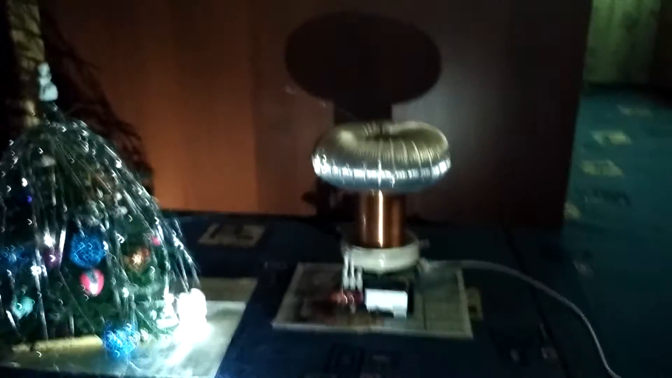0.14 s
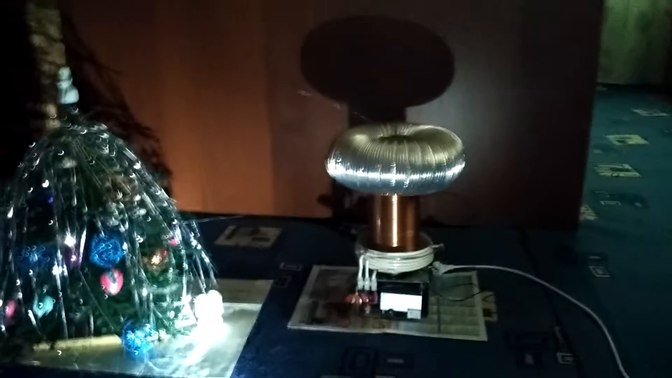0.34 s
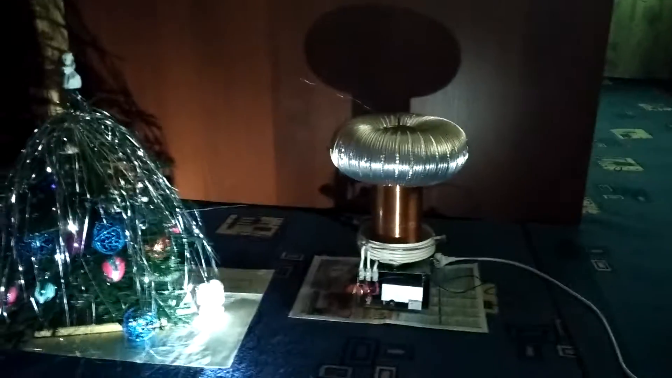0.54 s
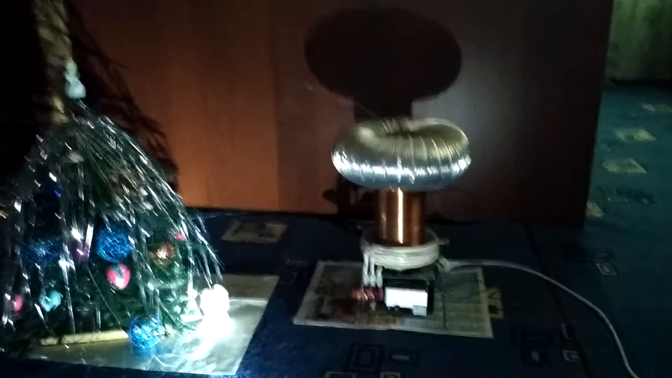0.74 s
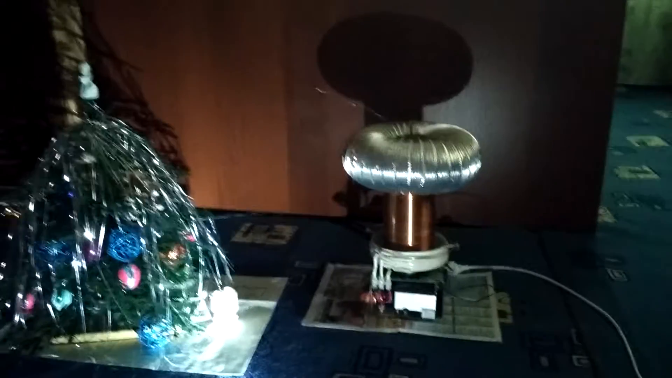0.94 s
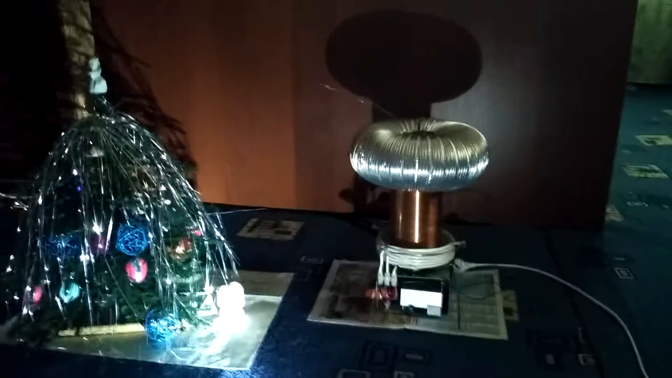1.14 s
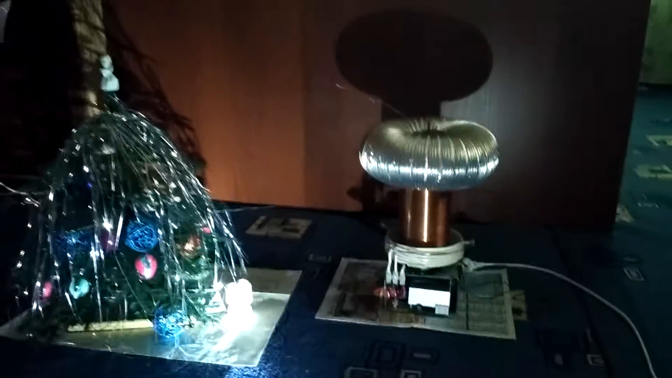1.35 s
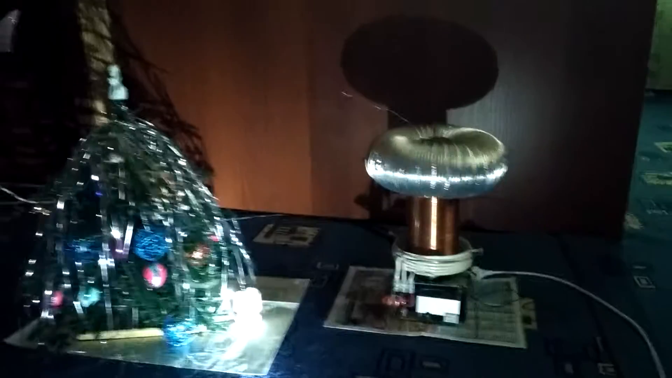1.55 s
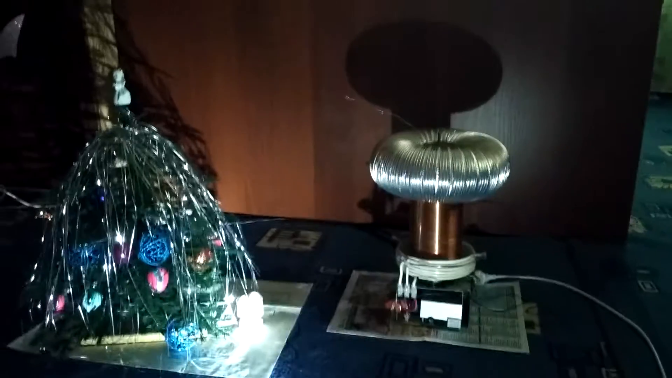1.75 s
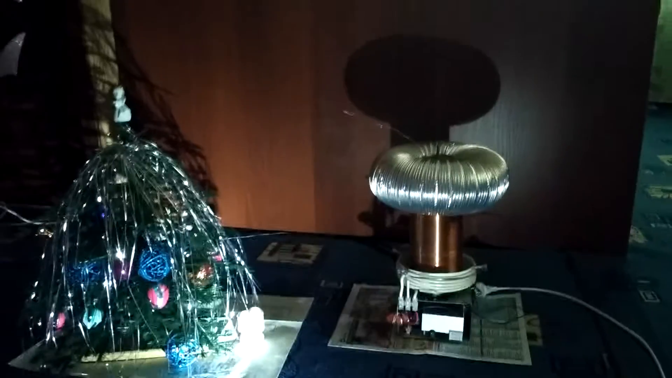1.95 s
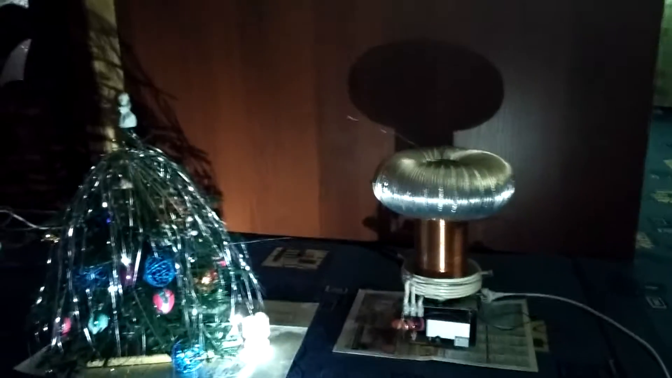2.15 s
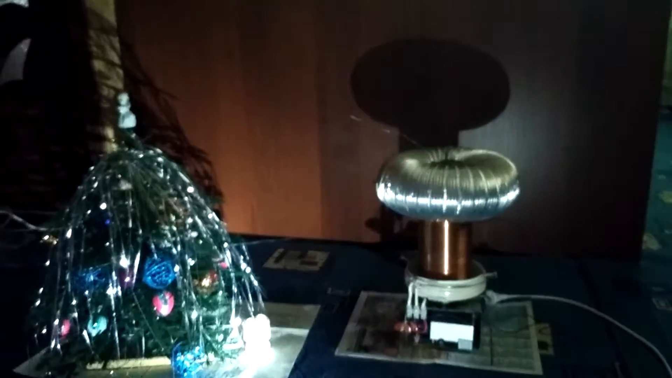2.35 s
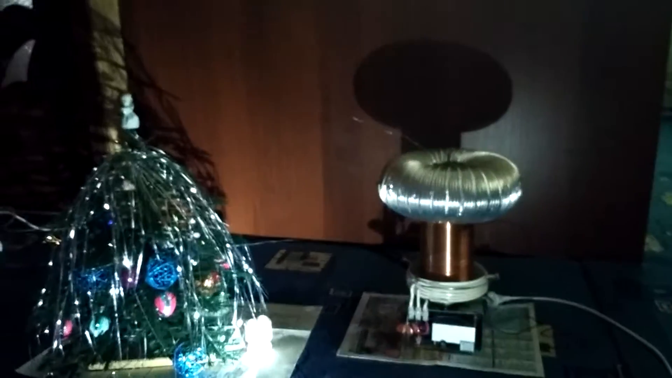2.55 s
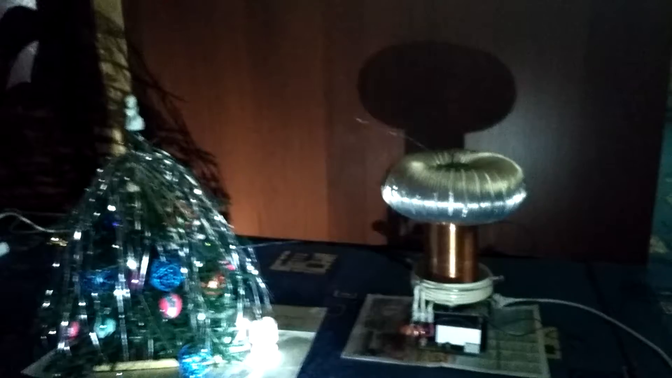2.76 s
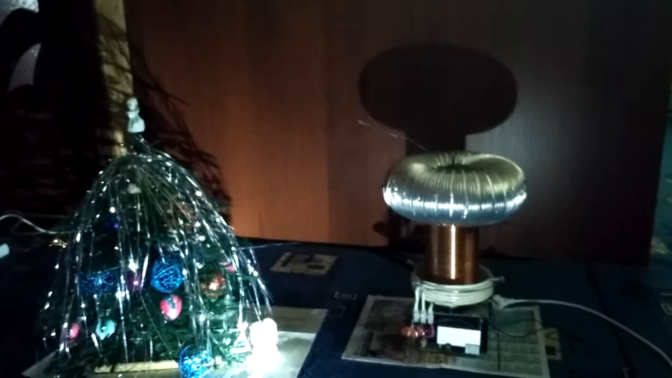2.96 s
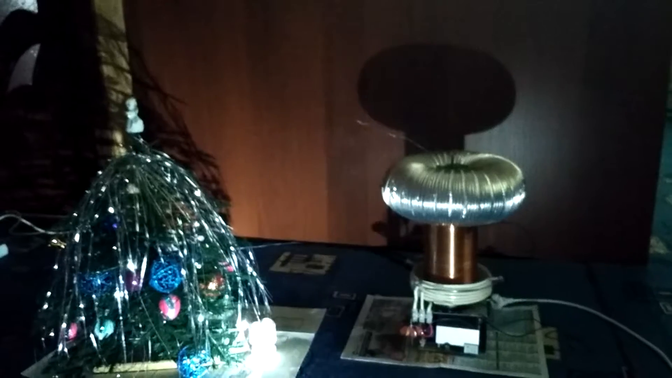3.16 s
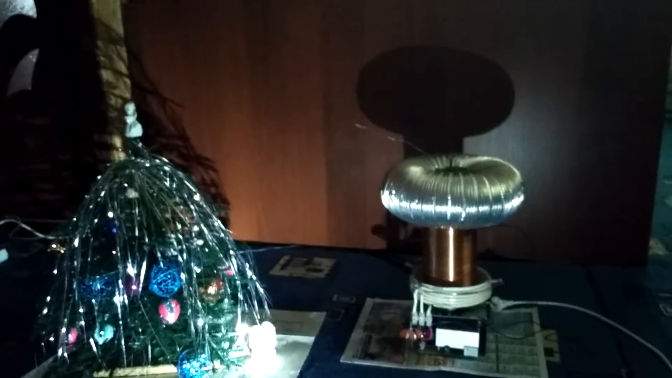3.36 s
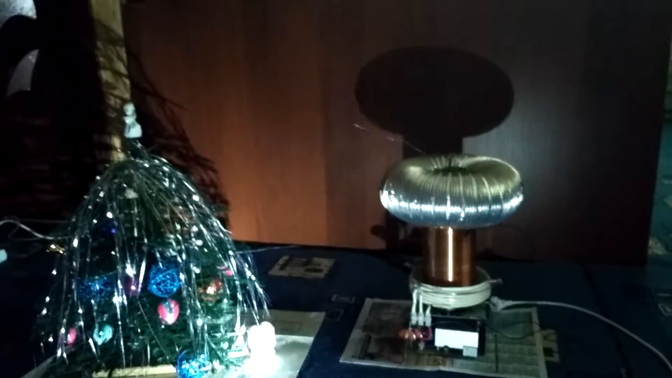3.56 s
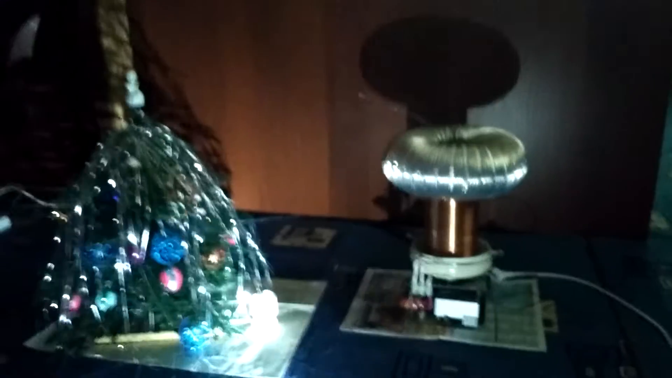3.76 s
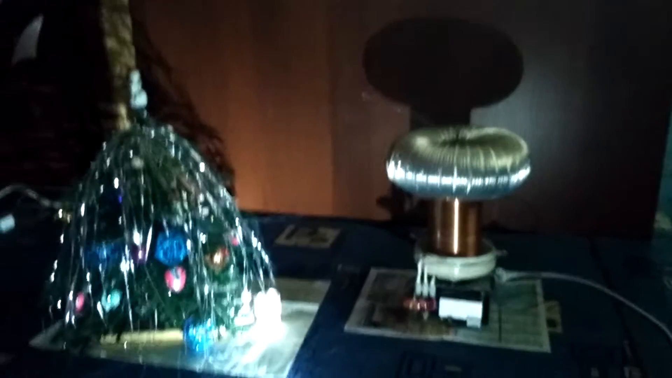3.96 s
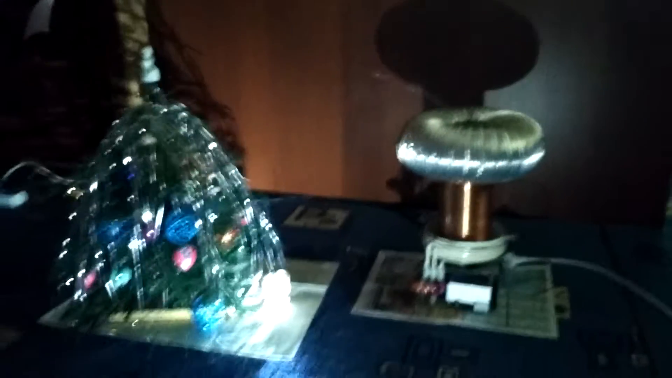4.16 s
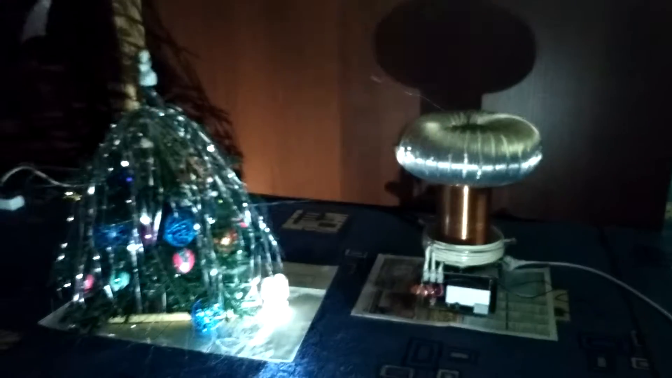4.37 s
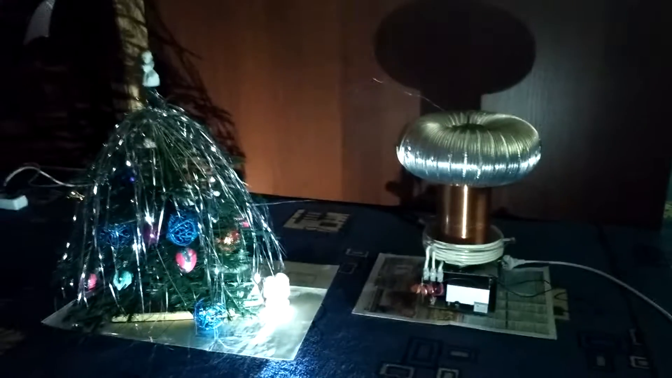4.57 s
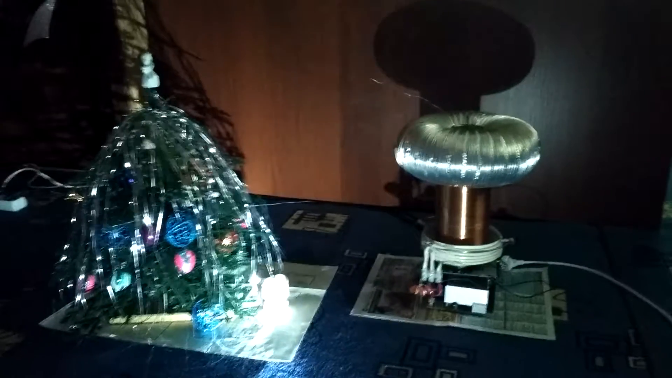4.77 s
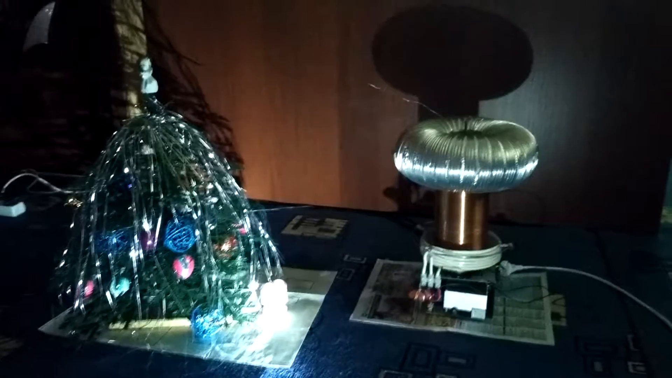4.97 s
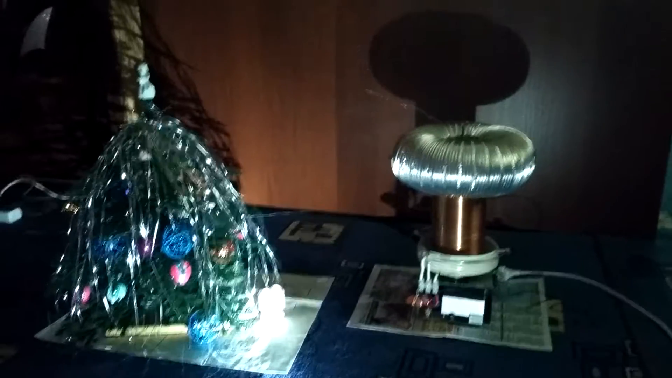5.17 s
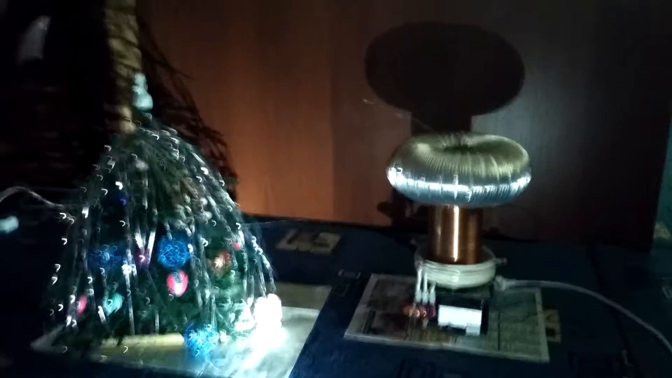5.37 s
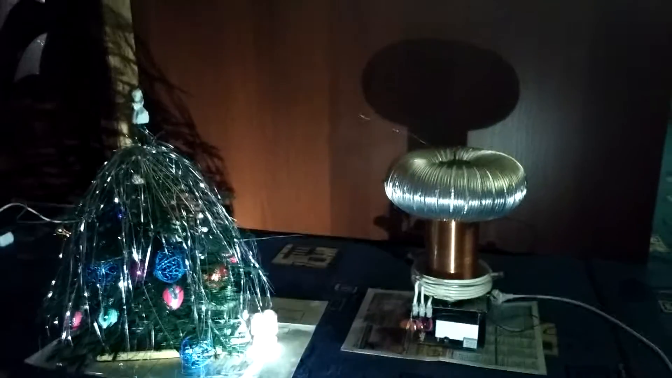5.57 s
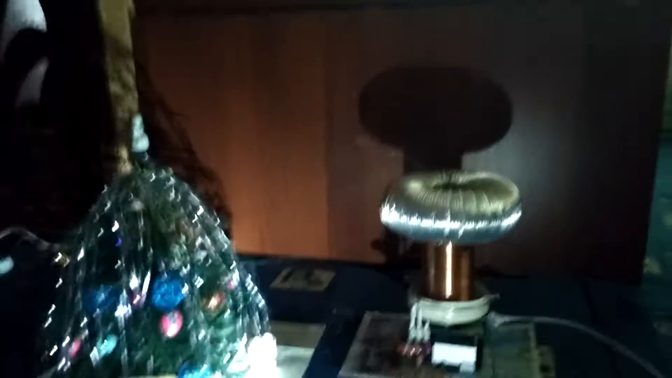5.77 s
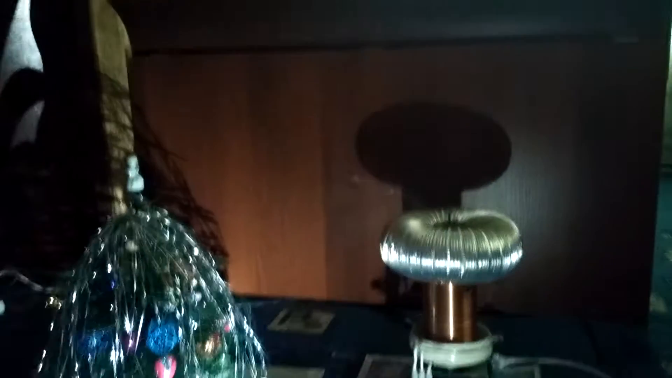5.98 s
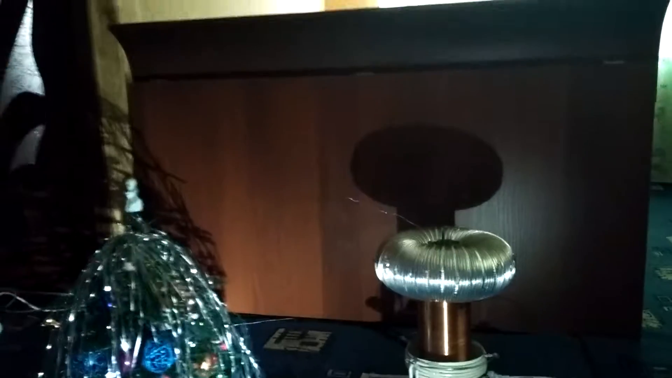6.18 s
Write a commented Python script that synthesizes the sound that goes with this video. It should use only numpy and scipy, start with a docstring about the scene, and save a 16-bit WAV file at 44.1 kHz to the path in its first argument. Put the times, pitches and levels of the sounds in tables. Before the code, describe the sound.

Close, overloaded microphone in a small indoor room. Handling thuds come first, the heaviest almost at once, followed by a light click over soft room hush. From about 1.4 seconds electric arcs snap in a strict rapid rhythm, five each second, until the end. Every snap is an abrupt bang with fizzing, grainy noise and dense early echoes, dying before the next; later ones sound brighter and more crackly.

```python
"""A furnished room: a small high-voltage coil fires five sparks a second close to a camera.
Each arc sends a shock pulse and a grainy noise crackle, which brighten as the arcs grow.
Wall echoes, a diffuse noise tail and ringing modes answer much alike; the microphone overloads.
Handling thumps come mostly before the sparks, with one among them; before them also faint timer
ticks and a switch click. Quiet room noise lies under all."""
import sys
import numpy as np
from scipy import signal
from scipy.io import wavfile
from scipy.ndimage import uniform_filter1d

SR = 44100
rng = np.random.default_rng(int(sys.argv[2]) if len(sys.argv) > 2 else 0)


def transcribe(signal):
    """Save signal, clipped to [-1, 1], as a 16-bit WAV file at the path in sys.argv[1]."""
    frames = np.atleast_2d(signal).T
    limited = np.clip(frames, -1, 1)
    pcm = np.round(limited * 32767).astype(np.int16)
    wavfile.write(sys.argv[1], SR, pcm)


def natural_amplitude(level_db):
    """Convert a level in decibels to a linear amplitude factor, elementwise."""
    exponent = np.asarray(level_db, float) / 20
    return 10 ** exponent


N = 274302


def read_table(points, hz):
    """Interpolates a spectrum table on a log-frequency axis."""
    table_hz, value = np.transpose(points)
    return np.interp(np.log(hz + 1), np.log(table_hz + 1), value)


def add(mix, start_s, sound):
    """Mixes a sound in at start_s; the end of the mix cuts it off."""
    part = mix[round(start_s * SR):][:len(sound)]
    part += sound[:len(part)]


def hush():
    """Quiet room: shaped noise with rumble and faint resonances in drifting patches."""
    # Each row: frequency in Hz, relative density in dB per Hz.
    hush_spectrum = [(25, -14.5), (78, 2.5), (140, -9.5), (280, -13), (400, -12), (480, -21.5),
                     (580, -14.5), (720, -28.5), (930, -17), (1300, -23), (2000, -26), (4800, -35.5),
                     (8000, -49), (16000, -48.5)]
    level_db, patch_rms_db = -54.5, 1.5
    frames, hz = N // 512 + 5, np.fft.rfftfreq(2048, 1 / SR)
    real, imag, patches = rng.standard_normal((frames, 1025, 3)).T
    patches = uniform_filter1d(patches, 10, axis=0)  # across frequency
    patches = uniform_filter1d(patches, 8, axis=1)  # across time
    shape_db = read_table(hush_spectrum, hz)[:, None] + patch_rms_db * patches / patches.std()
    noise = signal.istft((real + 1j * imag) * natural_amplitude(shape_db), nperseg=2048, noverlap=1536)[1][:N]
    return natural_amplitude(level_db) * noise / noise.std()


def bump(t, level_db, hz):
    """Dull bump: a sine that swells for about a cycle and sags in pitch."""
    rise_cycles, pitch_sag_per_s = 0.68, 2.6
    u = t * hz / rise_cycles
    swell = u * np.exp(1 - u)
    return -natural_amplitude(level_db) * swell * np.sin(2 * np.pi * hz * t * (1 - pitch_sag_per_s / 2 * t))


def click(t, level_db, hz, hiss_db, t60_s):
    """Small click: a short sine snap with decaying high-passed hiss behind it."""
    u = t - .0003
    snap = np.exp(-(u / .00007) ** 2) * np.sin(2 * np.pi * hz * u + .6)
    highpass = signal.butter(6, 4900, "high", fs=SR, output="sos")
    hiss = signal.sosfilt(highpass, rng.standard_normal(len(t)))
    return natural_amplitude(level_db) * (snap + natural_amplitude(hiss_db - 60 * t / t60_s) * hiss)


def handling():
    """Low bumps on the camera body, ticks of the timer and bright clicks."""
    # Each row: start in seconds, level in dB, initial pitch in Hz.
    bumps = [(.018, -34.5, 74.4), (0.145, -23.5, 108), (0.147, -43, 257), (.165, -15, 66), (.167, -37, 200),
             (.198, -23.5, 50), (.265, -44.5, 65.4), (.575, -47, 78.5), (5.4, -26, 58)]
    # Each row: start in seconds, level in dB, pitch in Hz, hiss before high-pass in dB re snap, hiss t60 in s.
    clicks = [(.806, -43, 7000, -20, .02), (.812, -49, 8000, -12, .03), (.8156, -27, 7600, -27, 0.35),
              (.8368, -42, 9100, -25, .03), (1.2113, -43.5, 7050, -7.5, 0.19)]
    # Ticks in step with the timer, before any arc forms. Each row: start in seconds, level in dB.
    ticks = [(.3777, -70), (.5776, -66), (.7775, -56), (.9774, -57)]
    t, out = np.arange(SR // 4) / SR, np.zeros(N)
    for start_s, level_db, hz in bumps:
        add(out, start_s, bump(t, level_db, hz))
    for start_s, level_db in ticks:
        add(out, start_s, click(t, level_db, hz=6000, hiss_db=-12, t60_s=.04))
    for start_s, level_db, hz, hiss_db, t60_s in clicks:
        add(out, start_s, click(t, level_db, hz, hiss_db, t60_s))
    return out


def tail(noise, colour, tilt_db_per_octave=0):
    """Coloured noise whose bands die at the room's speeds; unit noise starts near rms 1."""
    # Each row: frequency in Hz, t60 in seconds.
    band_t60 = [(100, 0.45), (500, 0.4), (2000, 0.27), (4500, 0.23), (5500, 0.27), (9000, 0.22),
                (15000, 0.18)]
    shelf_lo_hz, shelf_hi_hz = 5400, 10000  # the tilt acts between these
    hz, t, z = signal.stft(noise, SR, nperseg=256, noverlap=192)
    octaves = np.log2(np.clip(hz, shelf_lo_hz, shelf_hi_hz) / shelf_lo_hz)
    shape = natural_amplitude(read_table(colour, hz) + tilt_db_per_octave * octaves)
    shape /= np.sqrt(np.mean(shape ** 2))
    decay = natural_amplitude(-60 * t / read_table(band_t60, hz)[:, None])
    return signal.istft(z * shape[:, None] * decay, SR, nperseg=256, noverlap=192)[1][:len(noise)]


def room_answer(t):
    """Diffuse low and mid tail that follows a shock from one place."""
    # Each row: frequency in Hz, relative level in dB.
    diffuse_spectrum = [(100, -19.5), (300, -6), (500, -6), (1100, -8.5), (1500, -10.5), (2000, -11),
                        (3200, -31)]
    build_up = 1 - np.exp(-t / 0.0064)
    return natural_amplitude(-14.5) * tail(rng.standard_normal(len(t)), diffuse_spectrum) * build_up


def standing_waves(t):
    """Modes swell in and die; where the arc lands sets how hard each is struck."""
    # Room modes. Each row: frequency in Hz, relative level in dB, t60 in seconds before the extra decay.
    room_modes = [(84, -19.5, 0.3), (98.4, -17, .22), (128.5, -16.5, 0.26), (157.8, -14, 0.18),
                  (188.3, -22.5, 0.05), (228.7, -11.5, 0.15), (285.8, -21, 0.42), (359.6, -19.5, 0.42),
                  (405.7, -22.5, 0.44), (491.8, -27.5, 0.21), (559, -22, 0.081), (602, -20, 0.41),
                  (647.6, -29, 0.51), (713, -16.5, 0.15), (719.6, -18, 0.22), (819, -22.5, 0.27),
                  (829.4, -21, 0.18), (955, -26.5, 0.051), (1031, -17, .2), (1063, -14, 0.17),
                  (1096.6, -13, 0.2), (1185, -26, 0.33), (1235, -25, 0.21), (1422, -27, 0.6)]
    # Rings that build up late and outlast the rest. Each row: frequency in Hz, level in dB, t60 in seconds.
    late_rings = [(417.6, -26, .6), (533, -29, 0.68)]
    modes_db, strike_spread_db = -1.5, 2.2
    rings, late = np.zeros(len(t)), np.zeros(len(t))
    for (hz, level_db, t60_s), chance in zip(room_modes, rng.standard_normal(len(room_modes))):
        struck_db = level_db + strike_spread_db * chance
        rings += natural_amplitude(struck_db - 60 * t / t60_s) * np.sin(2 * np.pi * hz * t)
    for hz, level_db, t60_s in late_rings:
        late += natural_amplitude(level_db - 60 * t / t60_s) * np.sin(2 * np.pi * hz * t)
    extra_decay_db = -40 * (t / 0.2) ** 2  # the rings die ever faster, so the diffuse tail outlasts them
    rings *= natural_amplitude(modes_db + extra_decay_db) * (1 - np.exp(-t / 0.0025))
    return rings + late * (1 - np.exp(-(t / .04) ** 2))


def shocks(t):
    """A push and a pull for every path; the arc's new shape shifts and scales each a little."""
    # Direct shock and its strongest reflections. Each row: delay in seconds, relative level in dB.
    echo_paths = [(.0004, -3.5), (.0017, -9), (.0033, 1.5), (.0042, -7), (.0062, -6.5), (.0088, -13),
                  (0.0113, -1), (0.0122, -0.5), (0.015, -3), (0.02, -17.5), (.0260, -14), (.0290, -22),
                  (0.0367, -10.5), (0.0393, -8)]
    shift_spread_s, spread_db, push_s = .00004, 1.0, 0.00021
    out = np.zeros(len(t))
    for (delay_s, level_db), (shift, scale) in zip(echo_paths, rng.standard_normal((len(echo_paths), 2))):
        u = (t - delay_s - shift_spread_s * shift) / push_s
        pulse = np.exp(-u ** 2) - 0.38 * np.exp(-((u - 2.3) / 3.2) ** 2)
        out += natural_amplitude(level_db + spread_db * scale) * pulse
    return out


def crackle(t, tilt_db_per_octave):
    """The branching arc crackles: noise in uneven grains, new every spark."""
    # Each row: frequency in Hz, relative level in dB.
    crackle_spectrum = [(600, -20.5), (1500, 1.5), (2500, -1.5), (5000, -1.5), (9000, -4.5), (15500, -4)]
    noise, grain = rng.standard_normal((2, len(t)))
    # reflections smooth the grains out
    grain_db = 16 * uniform_filter1d(grain, size=21) * np.exp(-t / 0.086)
    return tail(noise * natural_amplitude(grain_db), crackle_spectrum, tilt_db_per_octave) * (1 - np.exp(-t / 0.0012))


def sparks():
    """The timer fires the coil five times a second; the arcs grow, gain shock level and brighten."""
    # How hard each arc crackles: one relative level in dB a firing.
    arc_crackle_db = [-2, -1, -1.75, 0.2, -1.6, -1.3, -1.2, -1, 0.5, 2.1, 1.1, 3.5, 0.5, 2.5, 1.1, 3.5, 1.3,
                      3.5, 2.5, 0.7, 2, 1, 2, 1, 2.5]
    first_s, period_s, jitter_s = 1.3773, .19992, .0001
    grow_mid_s, grow_width_s = 2.88, 0.27
    shock_first_db, shock_full_db, shock_spread_db = -2.05, -1.54, 0.93
    tilt_first, tilt_full, tilt_spread = -5, 1.5, 1  # dB per octave
    crackle_db, fresh_share = -9.5, .45
    t, out = np.arange(SR // 4) / SR, np.zeros(N)
    fade = natural_amplitude(-23 * (t / 0.18) ** 1.92)  # falls ever faster: 23 dB down at 0.18 s
    alike = room_answer(t)
    chances = rng.standard_normal((len(arc_crackle_db), 3))
    for k, (arc_db, (late, push, colour)) in enumerate(zip(arc_crackle_db, chances)):
        start_s = first_s + k * period_s + jitter_s * late
        grown = 1 / (1 + np.exp((grow_mid_s - start_s) / grow_width_s))
        shock_db = shock_first_db + (shock_full_db - shock_first_db) * grown + shock_spread_db * push
        tilt = tilt_first + (tilt_full - tilt_first) * grown + tilt_spread * colour
        # each arc takes a new path, so part of the answer is fresh
        body = np.sqrt(1 - fresh_share ** 2) * alike + fresh_share * room_answer(t)
        body += shocks(t) + standing_waves(t)
        spark = natural_amplitude(shock_db) * body + natural_amplitude(crackle_db + arc_db) * crackle(t, tilt)
        add(out, start_s, fade * spark)
    return out


def scene():
    """All sources at the one microphone."""
    return (hush() + handling() + sparks())[None]


def suppress(x):
    """Noise suppressor: what falls under the slow mean level is lowered; the treble follows only in part."""
    deepest_cut_db, margin_db, knee_db, memory_s = 16 / 1.5, -3, 2.2, 0.3
    split_hz, local_share, treble_share = 5000, .35, .15
    hz, t, z = signal.stft(x, SR, nperseg=512, noverlap=384)
    power = uniform_filter1d(abs(z) ** 2, size=7, axis=0)
    power = uniform_filter1d(power, size=3, axis=1)
    level_db = 10 * np.log10(abs(power) + 1e-13)
    hold = np.exp(-t[1] / memory_s)
    rise_db = level_db - level_db[:, :30].mean(axis=1, keepdims=True)
    over_db = rise_db - signal.lfilter([1 - hold], [1, -hold], rise_db, axis=1)
    treble = hz > split_hz
    over_db = local_share * over_db + (1 - local_share) * over_db[~treble].mean(axis=0)
    excess = np.clip((over_db - margin_db) / knee_db, -30, 30)
    cut_db = deepest_cut_db / (1 + np.exp(excess) / 1.5)
    cut_db[treble] = treble_share * cut_db[~treble].mean(axis=0)
    return signal.istft(z * natural_amplitude(-cut_db), SR, nperseg=512, noverlap=384)[1][:N]


def top_cut(x):
    """Nothing passes above the cut-off."""
    return signal.sosfilt(signal.butter(12, 16820, fs=SR, output="sos"), x)


def record(dry):
    """The microphone cuts deep bass and overloads; then noise suppression and the band limit."""
    ceiling, overload_power = .92, 4
    bass_cut = signal.butter(2, 72, "high", fs=SR, output="sos")
    heard = natural_amplitude(2.5) * signal.sosfilt(bass_cut, dry[0])
    clipped = heard / (1 + abs(heard / ceiling) ** overload_power) ** (1 / overload_power)
    cleaned = suppress(clipped)
    lowpass = signal.firwin(511, 15800, window=("kaiser", 8), fs=SR)
    limited = signal.oaconvolve(cleaned, lowpass, "same")
    return top_cut(np.clip(limited, -1, 1)[None])


dry = scene()
out = record(dry)
transcribe(out)
```